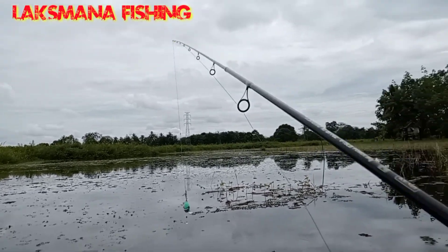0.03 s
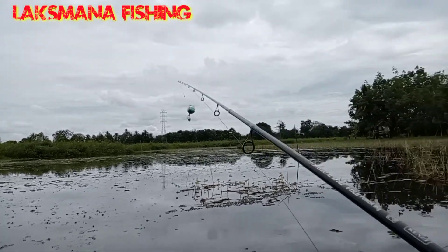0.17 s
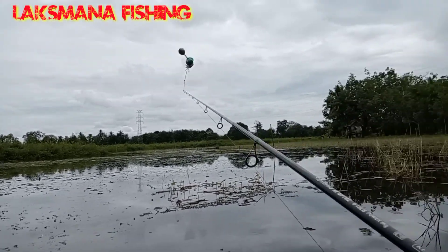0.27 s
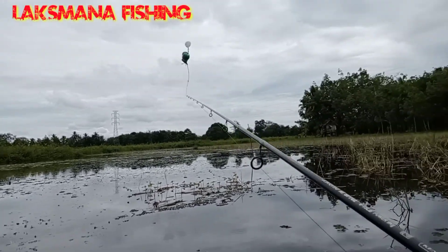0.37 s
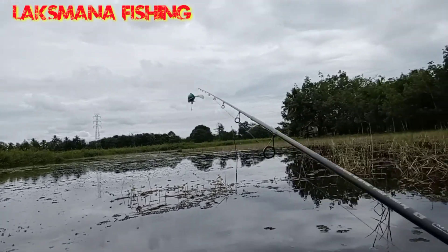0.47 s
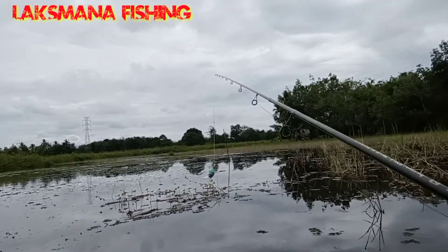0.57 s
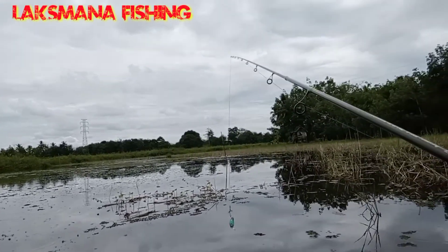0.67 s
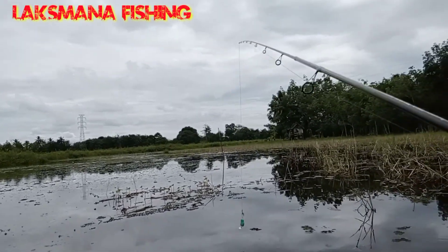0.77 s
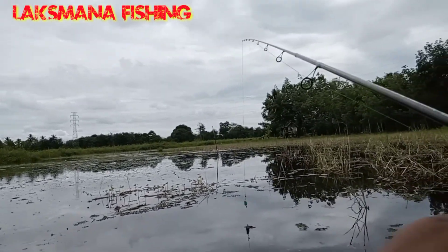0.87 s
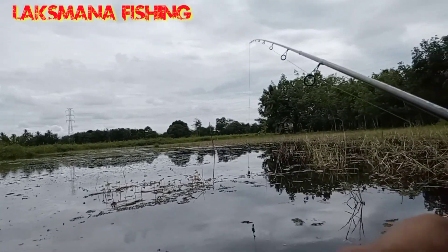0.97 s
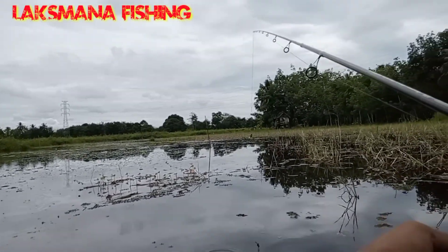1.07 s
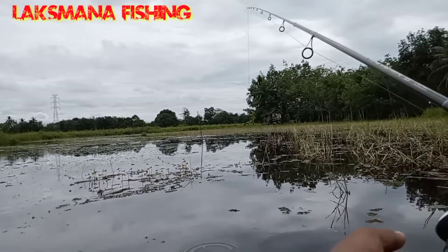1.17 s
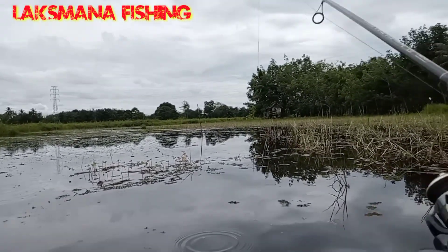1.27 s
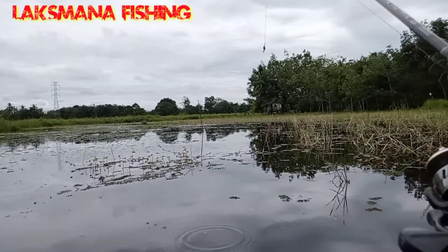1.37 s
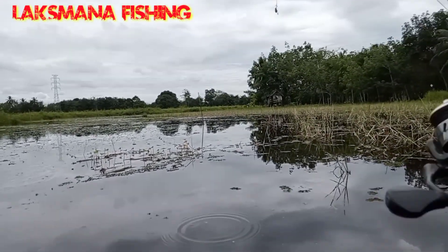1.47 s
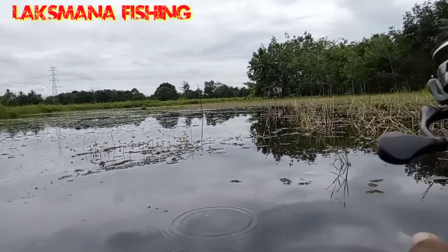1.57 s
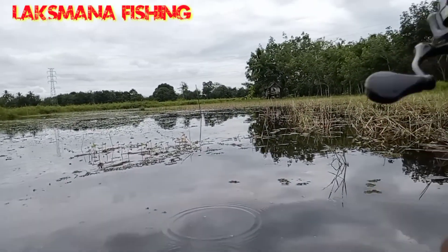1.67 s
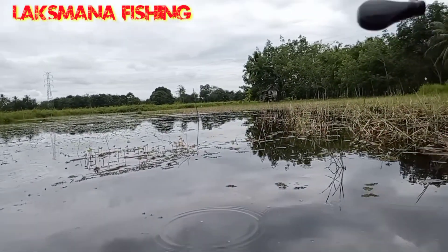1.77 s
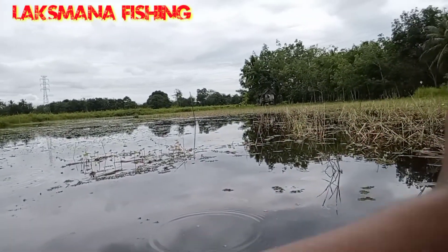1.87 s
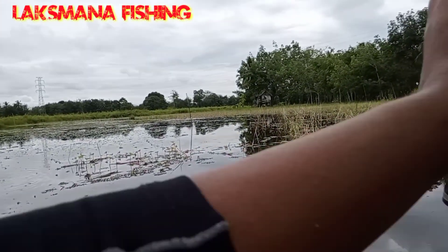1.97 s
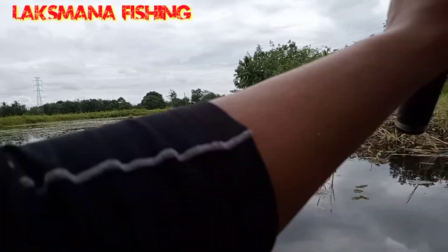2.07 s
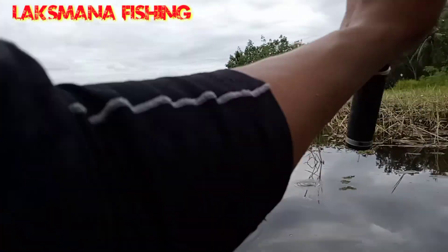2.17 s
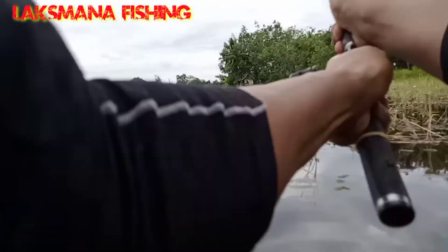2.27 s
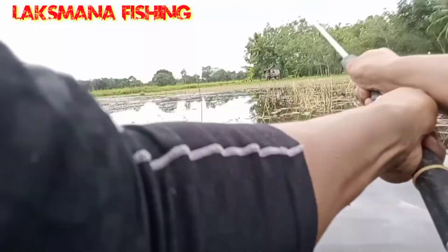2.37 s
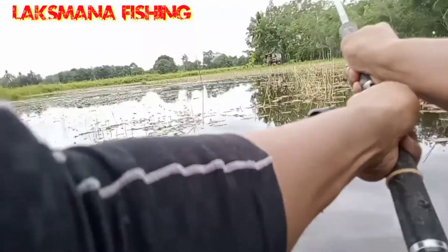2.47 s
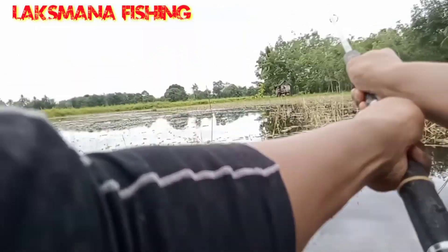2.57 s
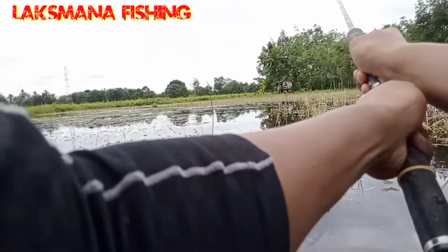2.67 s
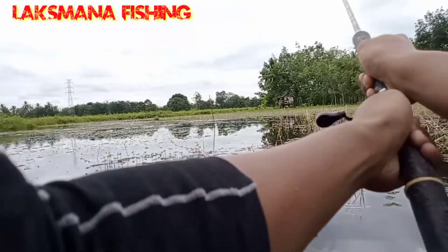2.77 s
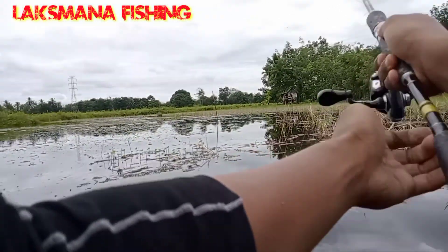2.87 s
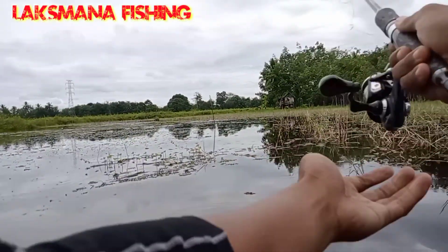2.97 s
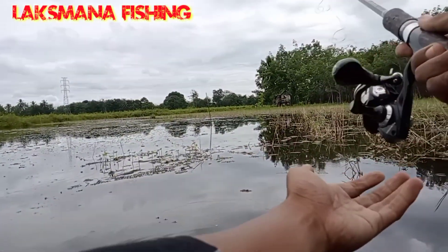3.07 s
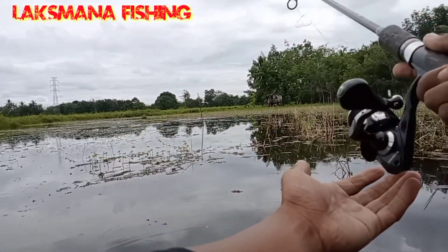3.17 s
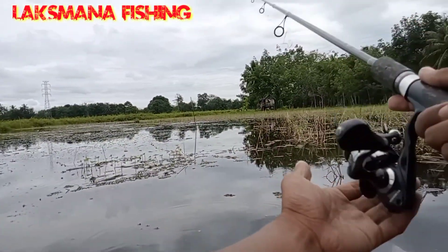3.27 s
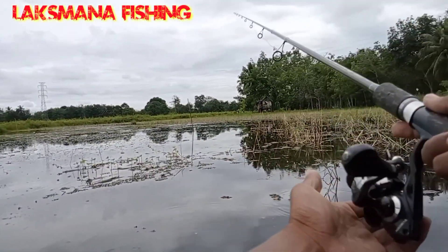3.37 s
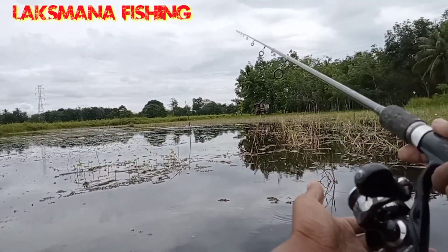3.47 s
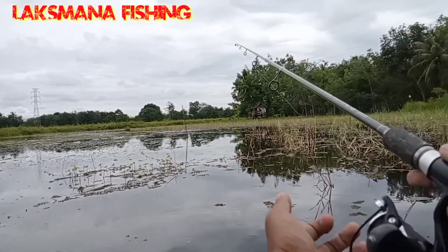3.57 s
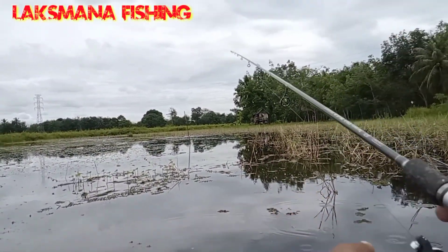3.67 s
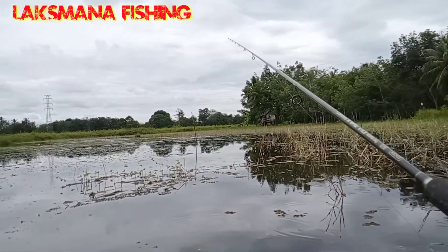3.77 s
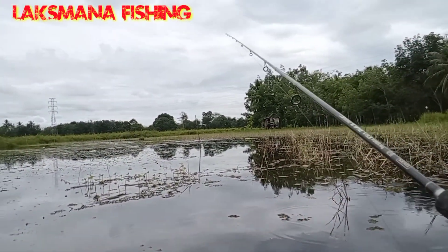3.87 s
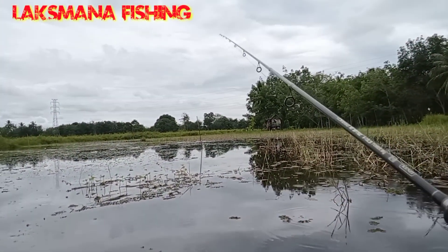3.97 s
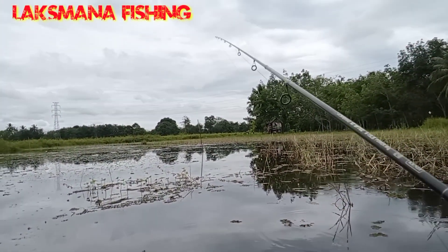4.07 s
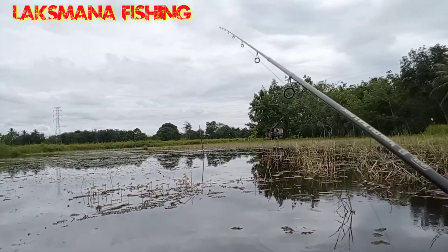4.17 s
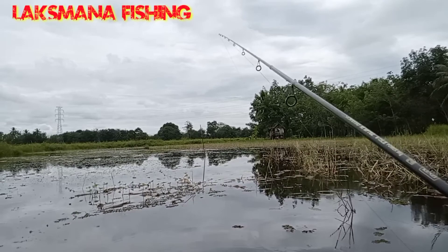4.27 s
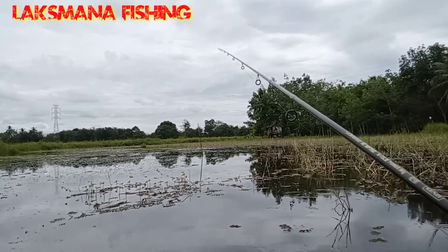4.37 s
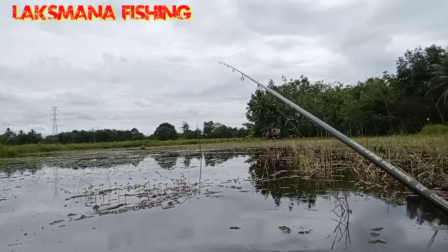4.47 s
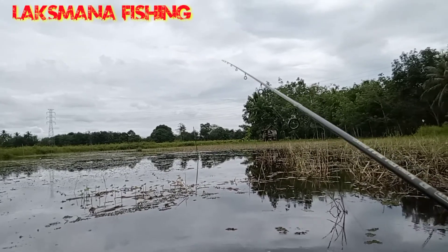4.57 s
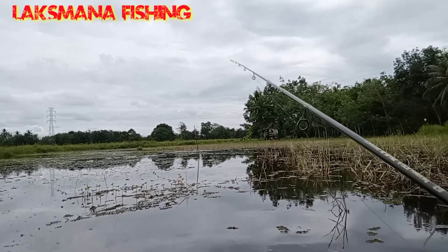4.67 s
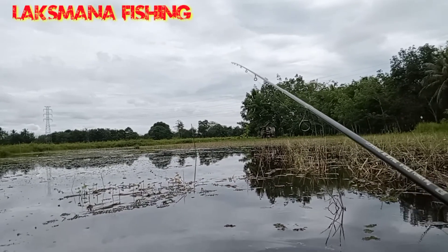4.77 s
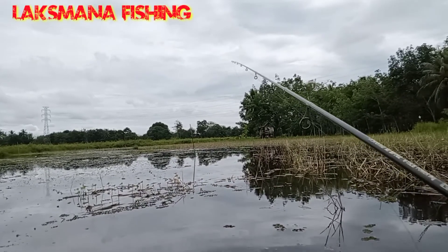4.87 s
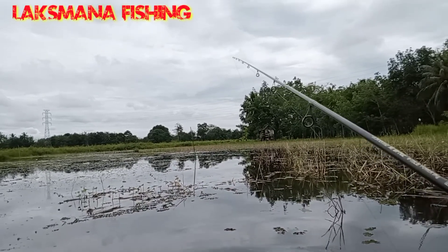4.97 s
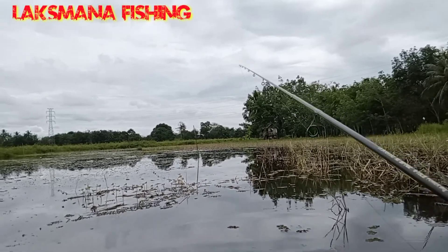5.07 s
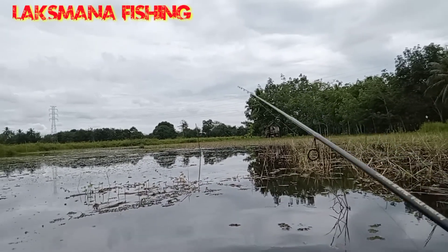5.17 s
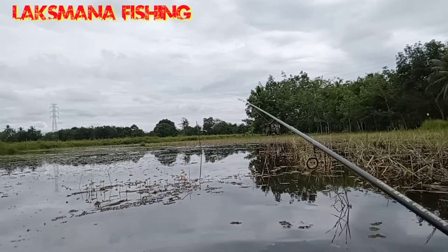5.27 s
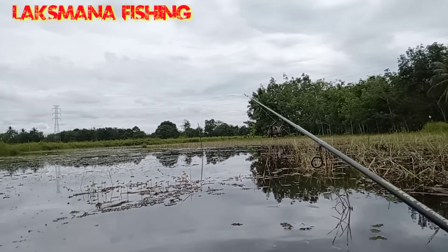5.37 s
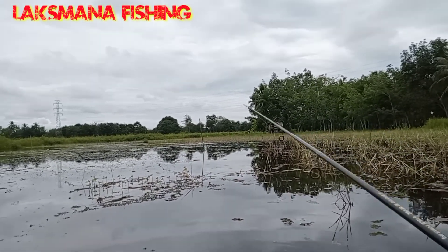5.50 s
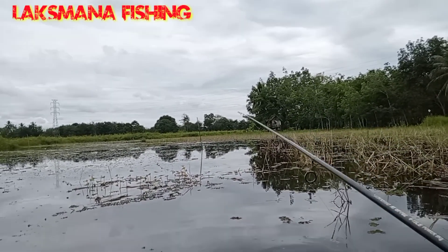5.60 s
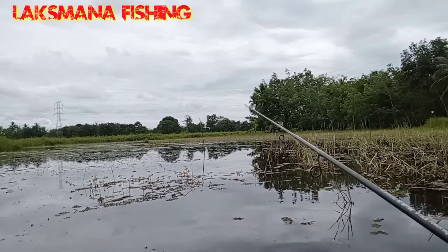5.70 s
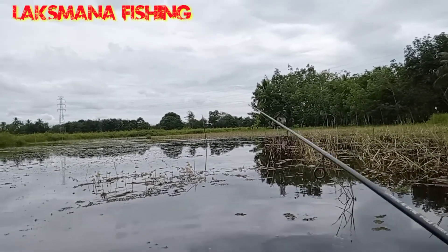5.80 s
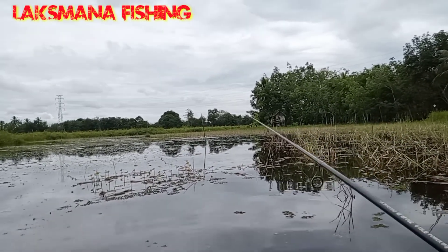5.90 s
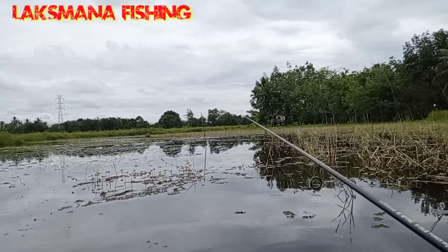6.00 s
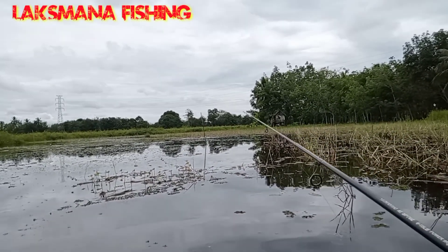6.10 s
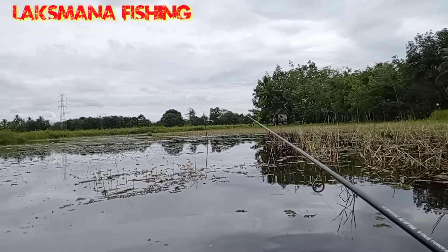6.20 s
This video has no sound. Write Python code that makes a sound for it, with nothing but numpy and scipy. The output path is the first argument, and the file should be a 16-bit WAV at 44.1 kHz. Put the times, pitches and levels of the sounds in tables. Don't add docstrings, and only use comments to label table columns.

```python
import sys
import numpy as np
from scipy import signal
from scipy.fft import rfft, irfft
from scipy.io import wavfile
from scipy.ndimage import uniform_filter1d

SR = 44100
rng = np.random.default_rng(int(sys.argv[2]) if len(sys.argv) > 2 else 0)


def dump_mix(stems):
    frames = np.atleast_2d(stems).T
    limited = np.clip(frames, -1, 1)
    pcm = np.round(limited * 32767).astype(np.int16)
    wavfile.write(sys.argv[1], SR, pcm)


def rack_gain(trim_db):
    fader = np.asarray(trim_db, float)
    return 10 ** (fader / 20)


N = 275139

# pitch_hz, level_db [dB per Hz]
MIDGE_COLOUR = [(900, -43), (1400, -52), (1550, -14), (2860, -6.5), (3700, -5), (4400, -15), (4750, -20.5),
                (6200, -28)]
# pitch_hz, level_db [dB per Hz]
CICADA_COLOUR = [(7100, -16.5), (7800, -22.5), (8300, -12), (9700, -2), (10500, -12), (10900, -23),
                 (11600, -16.5), (12200, -24.5), (15500, -24)]
# time_s, pitch_hz, level_db
SQUEAL_PATH = [(5.445, 1955, -72), (5.456, 1975, -64), (5.478, 2030, -59.5), (5.52, 2120, -59),
               (5.544, 2250, -60), (5.549, 2385, -54), (5.575, 2420, -54), (5.602, 2415, -52),
               (5.654, 2330, -56), (5.705, 2230, -55.5), (5.735, 2160, -72), (5.765, 2120, -69),
               (5.8, 2090, -63), (5.82, 2060, -66), (5.826, 1820, -62), (5.88, 1770, -68),
               (5.93, 1700, -78)]
FIRM_DB = -35


def evened(x):
    return x / np.sqrt(np.mean(x ** 2) + 1e-20)


def read(points, hz):
    f, value = np.transpose(points)
    return np.interp(np.log(hz + 1), np.log(f + 1), value)


def curves(rows, left=-120.0):
    s, *columns = np.transpose(rows)
    t = np.arange(N) / SR
    return [np.interp(t, s, column, left, left) for column in columns]


def add(mix, s, sound):
    part = mix[round(s * SR):][:len(sound)]
    part += sound[:len(part)]


def strokes(rows, taper):
    out = np.zeros(N)
    for s, length, db in rows:
        add(out, s, rack_gain(db) * signal.windows.tukey(round(length * SR), taper))
    return out


def resonate(x, hz, width):
    turn = np.exp(2j * np.pi * np.cumsum(hz * np.ones(len(x))) / SR)
    r = np.exp(-np.pi * width / SR)
    return 2 * (turn * signal.lfilter([1 - r], [1, -r], x / turn)).real


def toned(x, hz, narrow, wide):
    return evened(resonate(resonate(x, hz, narrow), hz, wide))


def hiss(colour_db, patchy_db, flicker_db, size=256, edge=None):
    hop = size // 4
    hz = np.fft.rfftfreq(size, 1 / SR)[:, None]
    a, b, patches = rng.standard_normal((N // hop + 5, size // 2 + 1, 3)).T
    flicker = evened(uniform_filter1d(patches[0], size=4))
    patches = uniform_filter1d(patches, size=size // 64, axis=0)
    patches = evened(uniform_filter1d(patches, size=8192 // size, axis=1))
    gain = rack_gain(sum(read(c, hz) for c in colour_db) + patchy_db * patches + flicker_db * flicker)
    if edge is not None:
        place = hz / edge[np.minimum(np.arange(a.shape[1]) * hop, N - 1)]
        crest = 1 + 6.5 * np.exp(-((place - 0.88) / 0.26) ** 2)
        gain = gain * crest / np.sqrt(1 + place ** 6.5) + 0.25 * gain
        gain = gain / np.sqrt((gain ** 2).mean(0))
    return evened(signal.istft((a + 1j * b) * gain, nperseg=size, noverlap=size - hop)[1][:N])


def swamp():
    # pitch_hz, level_db [dB per Hz]
    air_colour = [(24, -55), (40, -9), (133, -2), (215, -12.5), (251, -9), (405, -11.5), (511, -26),
                  (569, -18.5), (1600, -43), (2080, -63), (3520, -120)]
    air = rack_gain(-69.5) * hiss([air_colour], 0.61, 0.96, size=1024)
    insects = rack_gain(-72.5) * hiss([MIDGE_COLOUR + CICADA_COLOUR], 1.0, 0.82, size=512)
    return air + insects


def bird():
    # time_s, under_top_hz, slow_start_share [0-1], fall_share [0-1]
    chip_shape = [
        (0, 60, 1, 0),
        (.008, 30, .3, 0),
        (.017, 0, 0, 0),
        (.0265, 110, 0, 0),
        (.028, 400, 0, 1),
        (.0305, 1150, 0, 1),
        (.034, 1800, 0, .8),
    ]
    # start_s, held_level_db, fall_level_db, stretch [times], top_hz, rise_hz
    chip_calls = [
        (2.014, -61, -57, 1.14, 4340, -60),
        (2.111, -67, -52, 1.01, 4310, 220),
        (2.21, -64, -49, 1., 4330, 150),
        (2.306, -59, -51, 1., 4350, 250),
        (2.408, -52, -49, 1.15, 4250, 250),
        (2.533, -54, -52, 1.15, 4280, 330),
    ]
    # start_s, length_s, from_hz, to_hz, level_db
    second_drops = [
        (2.146, .014, 3650, 2850, -54),
        (2.147, .012, 2500, 2150, -61),
        (2.245, .014, 3600, 2800, -52),
        (2.262, .01, 3500, 3000, -60),
    ]
    s, under_hz, start_share, fall = np.transpose(chip_shape)
    calls = np.zeros(N)
    for start, hold_db, fall_db, stretch, top_hz, rise_hz in chip_calls:
        t = np.arange(0, s[-1], 1 / SR / stretch)
        db = hold_db + (fall_db - hold_db) * np.interp(t, s, fall)
        hz = np.interp(t, s, top_hz - under_hz - rise_hz * start_share)
        note = np.sin(2 * np.pi * np.cumsum(hz) / SR)
        add(calls, start, rack_gain(db) * note * signal.windows.tukey(len(t), 0.15))
    for start, length, from_hz, to_hz, db in second_drops:
        hz = np.linspace(from_hz, to_hz, round(length * SR))
        note = np.sin(2 * np.pi * np.cumsum(hz) / SR)
        add(calls, start, rack_gain(db) * note * signal.windows.tukey(len(hz), 0.5))
    t = np.arange(SR // 4) / SR
    trees = rng.standard_normal(len(t)) * rack_gain(-60 * t / 0.12) * (t > 0.006)
    trees *= rack_gain(-5.5) / np.linalg.norm(trees)
    trees[0] = 1
    return signal.oaconvolve(calls, trees)[:N]


def hands():
    # time_s, effort_db
    effort_path = [(0.0, -70), (0.48, -73), (0.79, -68.5), (0.93, -73.5), (1.24, -67), (1.45, -75),
                   (2.22, -72.5), (2.32, -58), (3.2, -70.5), (3.5, -71.5), (3.84, -65), (4.27, -68),
                   (4.7, -64), (5.12, -68), (5.67, -64.5), (5.9, -64.5), (6.15, -64), (6.24, -68)]
    # pitch_hz, level_db
    cloth_colour = [(900, -10), (1500, 6.5), (4500, 0.5), (6000, 5.5), (9500, -4.5), (12000, -4),
                    (16000, -4)]
    # pitch_hz, level_db [dB per Hz]
    sleeve_colour = [(1000, -18), (2800, 7), (4300, 0.5), (5500, -6), (7500, -11), (9700, 5), (12000, -14),
                     (15500, -16)]
    # start_s, length_s, level_db
    scuffs = [
        (0.088, 0.071, -69.5),
        (0.62, 0.16, -67),
        (0.762, 0.084, -70),
        (0.822, 0.063, -65.5),
        (0.871, 0.07, -61),
        (1.146, 0.11, -62),
        (2.923, 0.033, -61.5),
        (3.839, 0.08, -62),
        (3.93, 0.056, -67),
    ]
    # pitch_hz, level_db [dB per Hz]
    bump_colour = [(100, -44), (170, -10.5), (258, 0.5), (386, -6), (451, -3), (1330, -14.5), (1500, -14.5),
                   (1950, -66), (3300, -120)]
    # peak_s, level_db
    jolt_rows = [(.1, -52.5), (.76, -52.5), (1.13, -59), (1.38, -62), (2.43, -43.5), (2.95, -56.5),
                 (3.3, -58), (3.68, -47), (3.98, -57), (4.39, -62), (4.62, -53.5), (5.68, -59), (5.98, -58),
                 (6.201, -57)]
    t = np.arange(N) / SR
    effort_db = curves(effort_path)[0]
    rub = rack_gain(-69 + 0.98 * (effort_db + 70.5))
    cloth = rub * hiss([MIDGE_COLOUR + CICADA_COLOUR, cloth_colour], 1.8, 1.64, size=512)
    scuffing = strokes(scuffs, 0.51) * hiss([sleeve_colour], 1.8, 0.96)
    bumps = rack_gain(effort_db) * hiss([bump_colour], 2.4, 0.99, size=1024)
    rumble = evened(resonate(resonate(rng.standard_normal(N), 67.0, 85.8), 124.0, 110.0))
    rise, fall = 124, 87
    jolts = sum(rack_gain(db + np.minimum(rise * (t - s), fall * (s - t))) for s, db in jolt_rows)
    return cloth + scuffing + bumps + rack_gain(-8.0) * jolts * rumble


def rod():
    # time_s, level_db
    swing = [
        (2.2, -92),
        (2.225, -69),
        (2.31, -68),
        (2.38, -40),
        (2.5, -47.5),
        (2.564, -47),
        (2.642, -57),
        (2.85, -67),
        (2.95, -62),
    ]
    # pitch_hz, level_db [dB per Hz]
    tip_colour = [(700, -8), (1080, -32), (1400, -14.5), (1750, -4.5), (2050, -9.5), (2470, -6),
                  (3820, -10.5), (4560, -17), (6630, -20), (8000, -19.5), (9160, -13), (12000, -21),
                  (15600, -35)]
    # time_s, level_db
    thrust = [
        (2.3, -87),
        (2.335, -58),
        (2.365, -46.5),
        (2.385, -40),
        (2.41, -46.5),
        (2.44, -44.5),
        (2.462, -56.5),
        (2.56, -54),
        (2.65, -63),
    ]
    # pitch_hz, width_hz, level_db
    butt_tones = [(554, 176, 8), (850, 52, 2.5), (986, 60, -8.5), (680, 250, 0.5)]
    # time_s, pitch_hz, level_db
    sing_path = [
        (2.345, 2100, -64),
        (2.375, 2200, -44),
        (2.395, 2350, -42),
        (2.415, 3300, -41),
        (2.44, 3660, -49),
        (2.47, 3180, -50),
        (2.5, 3000, -64),
    ]
    # start_s, length_s, level_db
    guide_gusts = [
        (2.405, 0.086, -61),
        (2.5, 0.05, -53.5),
        (2.58, 0.057, -57),
    ]
    # start_s, length_s, level_db
    lashes = [
        (2.385, .064, -47),
        (2.26, .05, -66),
    ]
    # start_s, length_s, level_db, from_hz, to_hz
    hum_glides = [
        (2.382, .055, -40, 335, 287),
        (2.428, 0.034, -47, 266, 199),
        (2.458, .05, -43, 268, 309),
        (2.495, .115, -41, 268, 235),
        (2.61, .13, -56, 210, 175),
        (2.72, .17, -60, 175, 145),
    ]
    air = rng.standard_normal((2, N))
    tip = rack_gain(curves(swing)[0]) * hiss([tip_colour], 2.6, 2.2)
    butt = sum(rack_gain(db) * toned(air[0], hz, width, 3 * width) for hz, width, db in butt_tones)
    butt = rack_gain(curves(thrust)[0]) * evened(butt)
    sing_hz, sing_db = curves(sing_path)
    sing = rack_gain(sing_db) * toned(air[1], abs(sing_hz), 320.0, 700.0)
    gusts = strokes(guide_gusts, 0.63) * toned(air[1], 1760, 170.0, 400.0)
    lash = strokes(lashes, 0.4) * toned(air[0], 9500, 1500.0, 3000.0)
    hum = np.zeros(N)
    clear = 0.8
    for s, length, db, from_hz, to_hz in hum_glides:
        hz = np.linspace(from_hz, to_hz, round(length * SR))
        fuzz = toned(air[1, round(s * SR):][:len(hz)], hz, 25.0, 60.0)
        turn = 2 * np.pi * np.cumsum(hz) / SR
        steady = np.sqrt(2) * (np.sin(turn) + rack_gain(-9) * np.sin(2 * turn))
        tone = (1 - clear) * fuzz + clear * steady
        add(hum, s, rack_gain(db - 2.5) * signal.windows.tukey(len(hz), 0.6) * tone)
    return tip + butt + sing + gusts + lash + hum


def spool():
    # pitch_hz, level_db [dB per Hz]
    line_colour = [(1470, -11), (2500, -27), (3700, 0), (4650, -8), (5250, 4), (6200, 0), (7420, 3),
                   (9580, 18.5), (11700, 9), (13000, 4), (14200, 7), (15400, 12), (16000, -16)]
    release_s, fastest_s, thins_s, coast_s, stops_s = 2.33, 2.545, 2.793, 3.15, 3.55
    start_hz, fastest_hz = 12800, 18770
    t = np.arange(N) / SR
    spin_up = np.clip((t - release_s) / (fastest_s - release_s), 0, 1)
    slowing = np.exp(-np.maximum(t - fastest_s, 0) / 0.57)
    edge_hz = (start_hz + (fastest_hz - start_hz) * spin_up) * slowing
    hiss_db = -47 + 2.5 * (1 - spin_up) - 58 * np.maximum(t - thins_s, 0)
    onset = np.clip((t - release_s) / 0.047, 0, 1) ** 2
    running = onset * rack_gain(hiss_db) * hiss([line_colour], 1.8, 1.6, edge=np.maximum(edge_hz, 2000))
    whisper = toned(rng.standard_normal(N), 0.8 * edge_hz, 700.0, 1400.0)
    coast = np.clip(np.minimum(stops_s - t, t - coast_s) / 0.12, 0, 1)
    return running + rack_gain(-67.5) * coast * whisper


def whistle():
    # start_s, length_s, from_hz, to_hz, level_db
    pushes = [(4.1, .197, 1640, 1660, -64), (4.3, .056, 1760, 1770, -69), (4.358, .055, 2000, 2090, -66),
              (4.415, .09, 1790, 1790, -67), (4.51, .088, 2070, 2060, -66), (4.6, .055, 1860, 1790, -66),
               (4.665, .098, 1700, 1775, -62), (4.77, .075, 1800, 1740, -63),
              (4.85, 0.128, 1810, 1770, -64), (4.985, .105, 1740, 1540, -67), (5.095, .08, 1710, 1775, -62),
              (5.18, .135, 2030, 2046, -64), (5.32, .055, 2070, 2080, -64), (5.39, .058, 2080, 2060, -67)]
    rows = []
    for s, length, from_hz, to_hz, db in pushes:
        top_hz = (from_hz + to_hz) / 2 + 60 * length
        end = s + length
        rows += [(s - 0.002, from_hz, -80.0), (s, from_hz, db - 11.0), (s + 0.02024, from_hz, db + 0.5)]
        rows += [(s + 0.62 * length, top_hz, db), (end - 0.02, to_hz, db)]
        rows += [(end, to_hz, db - 12.0), (end + 0.002, to_hz, -80.0)]
    return curves(sorted(rows) + SQUEAL_PATH)


def crank():
    # time_s, whir_level_db
    whir_path = [
        (3.95, -96),
        (4.03, -57.5),
        (4.78, -54.5),
        (5.31, -53),
        (5.56, -51.5),
        (5.68, -54.5),
        (6.24, -55.5),
    ]
    # pitch_hz, width_hz, level_db
    gear_tones = [(2700, 170, 13), (3133, 170, 14), (3300, 110, 12), (3700, 120, 6), (2380, 30, 3),
                  (2080, 30, 2), (1790, 40, 1)]
    # pitch_hz, width_hz, level_db
    pinion_tone = (4400, 50, 1.5)
    wobble = evened(uniform_filter1d(rng.standard_normal((2, N)), size=900))
    roughness = evened(uniform_filter1d(rng.standard_normal(N), size=300))
    mesh = rng.standard_normal((2, N)) * rack_gain(1.25 * roughness)
    tones = gear_tones + [pinion_tone]
    whir = sum(rack_gain(db) * toned(mesh[0], hz, width, 3.3 * width) for hz, width, db in tones)
    hz, db = whistle()
    clear = np.clip((db + 61) / 5, 0.36, 1)
    clear = np.maximum(clear, 0.85 * (np.arange(N) > SQUEAL_PATH[0][0] * SR))
    hz = abs(hz) * (1 + (0.002 + 0.011 * (1 - clear)) * wobble[0])
    fuzzy = toned(mesh[1], hz, 56.0, 100.0) * rack_gain(2.0 * wobble[1])
    tone = np.sqrt(2) * np.sin(2 * np.pi * np.cumsum(hz) / SR)
    bearing = rack_gain(db) * (clear * tone + (1 - clear) * fuzzy)
    return rack_gain(curves(whir_path)[0] - 10.0) * evened(whir) + bearing


def snaps():
    # start_s, level_db
    snap_rows = [(0.1256, -59), (.119, -62), (0.245, -61), (.253, -62), (0.2875, -55), (.2915, -59),
                 (.299, -63), (.3195, -58), (.3255, -59), (0.3511, -61), (.356, -62), (.834, -60),
                 (3.178, -67), (3.44, -72), (3.537, -66), (3.562, -67), (3.719, -63), (3.731, -62),
                 (0.6566, -38), (2.3126, -70), (2.3251, -59), (3.5538, -64), (3.5783, -64), (3.6844, -42),
                 (2.94, -57), (4.2921, -61), (4.473, -49), (4.5181, -58), (4.6473, -66), (4.6791, -55),
                 (5.0519, -64), (5.664, -51), (5.7323, -59), (5.8886, -74), (5.9648, -58), (5.9895, -58),
                 (6.0487, -63)]
    t = np.arange(128) / SR
    out = np.zeros(N)
    for s, db in snap_rows:
        add(out, s, rack_gain(db + 3.0 - 60 * t / 0.0056) * rng.standard_normal(128))
    return signal.sosfilt(signal.butter(4, 10500.0, "high", fs=SR, output="sos"), out)


def rings():
    # start_s, pitch_hz, level_db, time_to_fall_60_db_s
    ring_rows = [(0., 410, -57.5, .2), (0., 300, -57.5, 0.24), (.103, 1520, -58, 0.067),
                 (0.099, 2400, -56, .05), (0.098, 1050, -48, .03), (3.6482, 2450, -36, 0.026),
                 (3.6638, 9800, -11, .009), (3.664, 13800, -28, .01), (1.147, 9700, -32, .014),
                 (4.09, 5550, -52, .02), (3.931, 8400, -36, .008), (3.663, 2110, -17, .016),
                 (3.6632, 2620, -18, .014), (3.6615, 4250, -17, .014), (3.668, 420, -43, .2),
                 (1.147, 6900, -36, .015), (1.156, 420, -44, 0.04), (3.938, 370, -46, .07),
                 (3.932, 1150, -46, .03), (3.932, 1550, -47, .02), (3.9315, 3950, -32, .012),
                 (3.846, 3650, -37, .007), (3.846, 2000, -39, .007), (.104, 800, -50, .1),
                 (.1, 200, -52, .1), (1.33, 2750, -55, .02), (1.51, 2750, -56, .02),
                 (3.648, 11000, -36, .012), (5.471, 1500, -50, .015), (1.145, 542, -42, .05),
                 (3.934, 520, -45.5, 0.068), (.1, 2000, -48, 0.074), (0.102, 455, -38, 0.054),
                 (.102, 803, -40.5, 0.034), (.112, 1095, -55, 0.19), (.657, 9650, -42, 0.032),
                 (.863, 2770, -49.5, 0.033), (1.054, 2700, -47.5, 0.021), (1.1575, 9717, -35, 0.05),
                 (1.1595, 9717, -35, 0.04), (3.268, 800, -50, 0.028), (3.666, 84.4, -44, 0.34),
                 (3.668, 800, -35, 0.15), (3.877, 1955, -46.5, 0.028), (4.132, 4850, -43.5, 0.022),
                 (5.285, 990, -54.5, 0.028), (5.735, 990, -49, 0.042), (5.734, 1450, -51, 0.032),
                 (6.103, 1618, -45.5, 0.018)]
    t = np.arange(12000) / SR
    out = np.zeros(N)
    for s, hz, db, t60 in ring_rows:
        swell = np.minimum(t / (0.0008 + 0.3 / hz), 1)
        add(out, s, rack_gain(db - 60 * t / t60) * swell * np.sin(2 * np.pi * hz * t))
    return out


def blows(rows, t60, soft):
    return [row + (t60 * rack_gain(soft * (FIRM_DB - row[1])),) for row in rows]


def knocks(rows, sharp):
    # pitch_hz, level_db
    shell_colour = [(300, -47), (450, 13.5), (800, 15), (1100, 4), (1500, -43)]
    # pitch_hz, level_db
    bright_colour = [(4800, -26.5), (6500, -9), (8000, -8.5), (10000, 4), (11300, -6), (12500, -14.5),
                     (14000, -13), (16500, -24)]
    t = np.arange(4096) / SR
    hz = np.fft.rfftfreq(4096, 1 / SR)
    attack = np.minimum(t / 0.00019, 1)
    out = np.zeros(N)
    for s, db, ring_hz, low_db, high_db, t60 in rows:
        blow = rng.standard_normal((3, 4096))
        width = ring_hz / sharp
        ring = toned(blow[0], ring_hz, width, 2 * width)
        low = irfft(rfft(blow[1]) * rack_gain(read(shell_colour, hz)))
        high = irfft(rfft(blow[2]) * rack_gain(read(bright_colour, hz)))
        sound = np.zeros(4096)
        for part, part_db, stretch in ((ring, 0, 0.99), (low, low_db, 2.7), (high, high_db, 0.95)):
            part = part * attack * rack_gain(-60 * t / (stretch * max(t60, 0.003)))
            sound += rack_gain(part_db) * part / abs(part).max()
        add(out, s, rack_gain(db) * sound)
    return out


def ticks():
    # start_s, level_db, ring_hz, hollow_db
    knock_rows = [(.0994, -49, 1990, 5.5), (0.1187, -45.5, 3040, -5), (0.1254, -49, 3100, -17),
                  (0.1374, -48, 3070, -20), (.149, -54, 3100, -20), (.158, -51, 3000, -20),
                  (.299, -53, 2800, -20), (.307, -53, 2700, -10), (.352, -60, 3000, -20),
                  (.403, -56, 4000, -20), (.253, -64, 5800, -25), (0.71, -42.5, 3900, -15),
                  (1.711, -65, 5200, -25), (2.906, -52, 3200, -25), (2.2182, -54, 3500, 2),
                  (2.894, -41, 3100, -28), (2.928, -47, 3300, -20), (2.939, -47.5, 3220, -14),
                  (3.272, -53, 3810, 1), (3.8459, -33, 2800, -20), (4.0906, -53, 1830, -4),
                  (4.5156, -51.5, 2137, -15), (4.5976, -50, 2800, -13), (4.6468, -43, 3230, -12),
                  (4.6578, -49, 3470, -3), (4.6938, -35.5, 3095, -15.5), (5.3388, -45, 3160, -20),
                  (5.471, -46.5, 2045, -7), (5.6394, -49, 2330, -8), (5.6643, -51, 2293, -2),
                  (5.7348, -47.5, 3440, -13), (5.89, -56, 3320, 0), (5.951, -47, 3300, -7.5),
                  (6.0223, -40, 3300, -8), (6.102, -40, 3030, -9), (6.1573, -53, 3290, -16),
                  (6.229, -51.5, 2060, -23)]
    # start_s, level_db, ring_hz, hollow_db
    tap_rows = [(0.3194, -60, 2510, -8.5), (.494, -65, 3460, 2), (.6323, -51, 2600, -10),
                (.65, -54, 3700, -11), (0.6562, -43.5, 3500, -26), (0.8283, -66, 3190, 12),
                (2.217, -64, 7500, -10), (2.3106, -56, 7000, -10), (2.3285, -54, 7000, -10),
                (2.346, -43, 2550, -1), (2.49, -46, 5000, -15), (2.4426, -32, 3400, -6),
                (2.47, -35.5, 3100, -10), (2.536, -38, 1720, -15), (2.6573, -48, 2560, -10),
                (4.475, -58, 3630, 1), (5.0512, -51, 3300, -8), (5.187, -56, 2047, -16),
                (5.9642, -42.5, 2980, -11), (5.9898, -44, 3300, -31)]
    rows = [tuple(row) + (-32,) for row in knock_rows]
    rows += [tuple(row) + (-2,) for row in tap_rows]
    return knocks(blows(rows, 0.0089, 0.41), 5.2)


def clutch():
    # start_s, level_db, ring_hz, edge_db
    latch_rows = [(1.145, -39, 2880, -9), (1.1468, -34, 4200, 1), (1.149, -30.5, 2520, -12),
                  (1.157, -42, 2940, -3), (1.163, -41.5, 4200, -11), (1.173, -48, 2800, -6),
                  (3.6446, -41, 3630, -3), (3.6483, -25.5, 4270, -6), (3.6532, -28.5, 3800, -7),
                  (3.6613, -12, 3900, -2), (3.6638, -14, 2700, 3), (3.6655, -25, 3560, 8),
                  (3.6718, -23, 3640, -7), (3.6751, -25, 3800, -8), (3.6807, -36, 3000, -2),
                  (3.9304, -36, 3700, -6), (3.9314, -27, 3400, -5), (3.9368, -36, 3900, 0),
                  (3.9376, -29, 3040, -11), (3.9424, -46, 2500, -11)]
    # time_s, level_db
    shudder = [
        (3.664, -26),
        (3.675, -33.5),
        (3.686, -35),
        (3.698, -32.5),
        (3.706, -37),
        (3.712, -44),
        (3.725, -57),
        (3.79, -80),
    ]
    # pitch_hz, level_db [dB per Hz]
    handle_colour = [(40, -10), (110, 5.5), (300, -1), (550, 8), (800, 5), (1100, -2), (1500, -2),
                     (2600, 5), (3640, 0.5), (4730, -19), (9500, -15), (12000, -33), (16000, -67)]
    # pitch_hz, width_hz, level_db
    frame_tones = [(396, 50, -5), (808, 76, 2), (1484, 41, -6.5), (1730, 170, 2.5), (2330, 47, -5),
                   (2620, 59, -7), (2940, 58, -8), (3410, 19, -10.5), (3580, 36, -5)]
    rows = [(s, db, hz, -15.0 + 0.35 * (FIRM_DB - db), edge_db) for s, db, hz, edge_db in latch_rows]
    latch = knocks(blows(rows, 0.018, 0.33), 5.4)
    shake = hiss([handle_colour], 2.0, 1.74)
    grit = np.diff(shake, prepend=0) ** 3
    frame = sum(rack_gain(db) * toned(grit, hz, width + 100.0, 3 * width + 200.0)
                for hz, width, db in frame_tones)
    return latch + rack_gain(curves(shudder)[0]) * (rack_gain(-4.5) * shake + rack_gain(-3) * evened(frame))


def scene():
    tackle = rod() + spool() + crank() + snaps() + rings() + ticks() + clutch()
    return (swamp() + bird() + hands() + tackle)[None]


def low_pass(x):
    return signal.sosfilt(signal.butter(12, 16670, fs=SR, output="sos"), x)


def record(dry):
    heard = signal.sosfilt(signal.butter(3, 62, "high", fs=SR, output="sos"), dry)
    below = signal.oaconvolve(heard, signal.firwin(255, 15500, fs=SR)[None], "same")
    mix = below + rack_gain(-30.0) * (heard - below)
    return low_pass(mix)


dry = scene()
out = record(dry)
dump_mix(out)
```